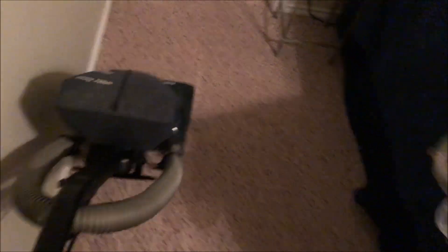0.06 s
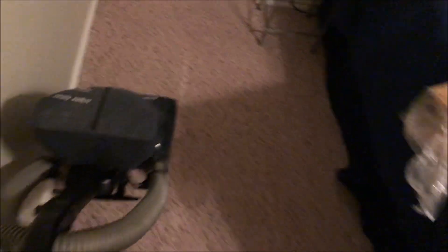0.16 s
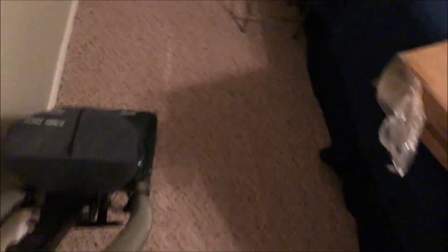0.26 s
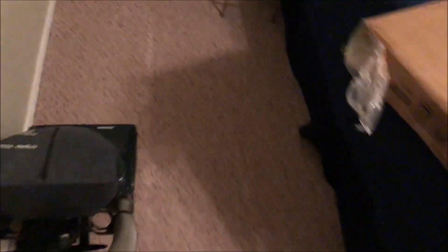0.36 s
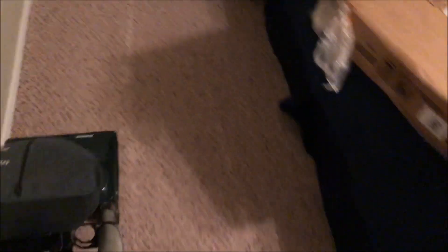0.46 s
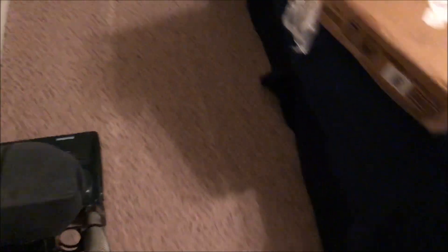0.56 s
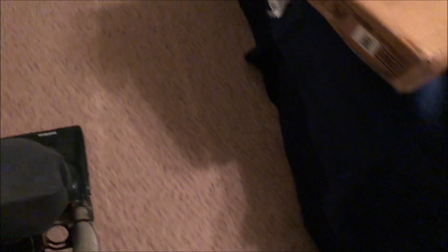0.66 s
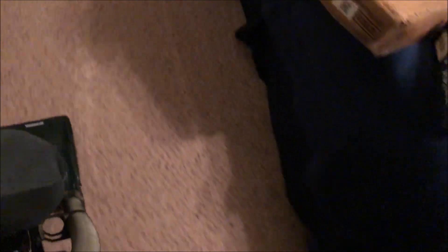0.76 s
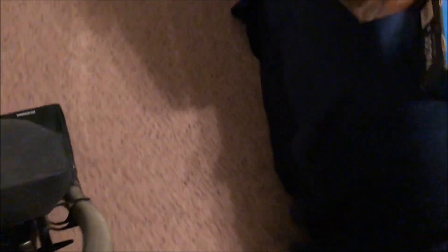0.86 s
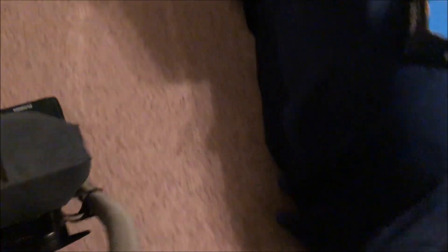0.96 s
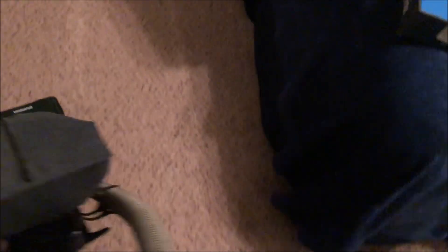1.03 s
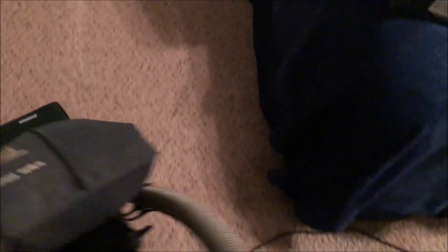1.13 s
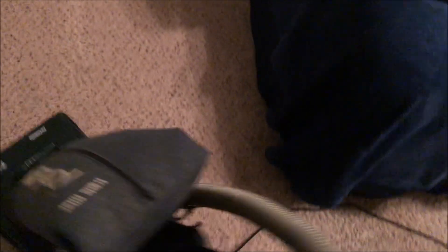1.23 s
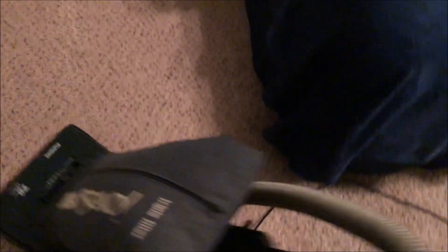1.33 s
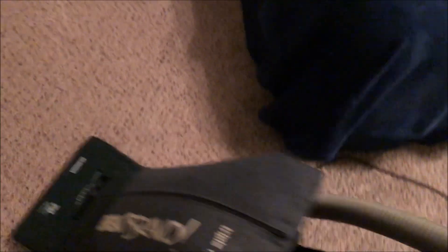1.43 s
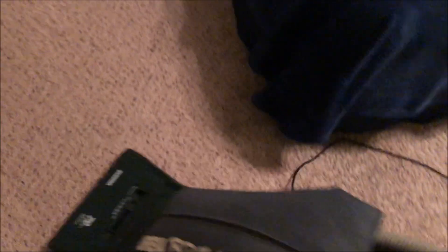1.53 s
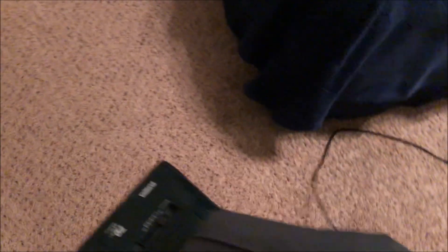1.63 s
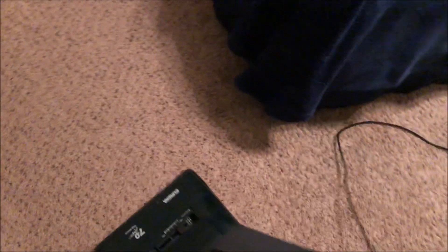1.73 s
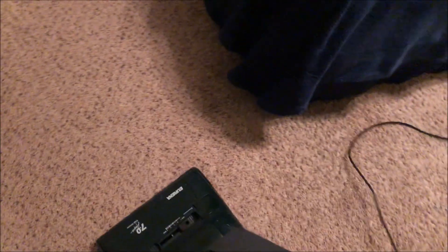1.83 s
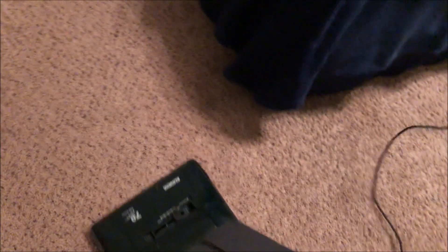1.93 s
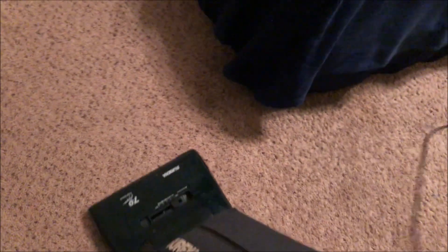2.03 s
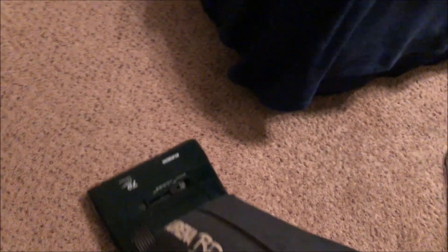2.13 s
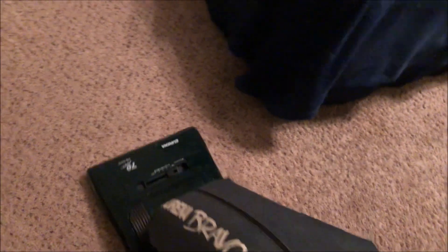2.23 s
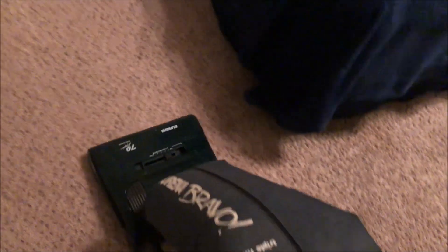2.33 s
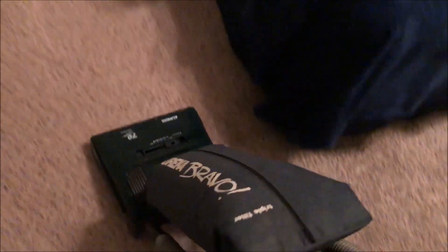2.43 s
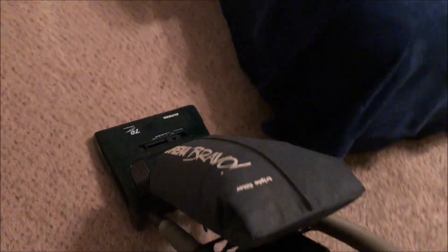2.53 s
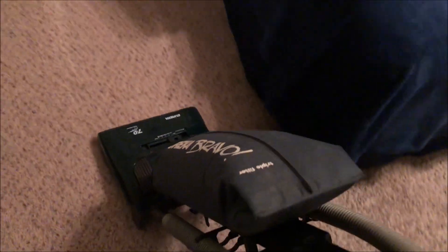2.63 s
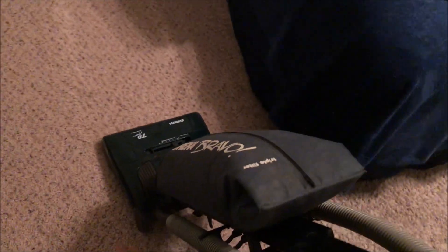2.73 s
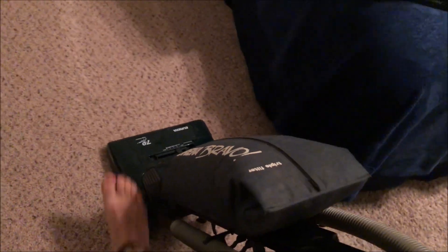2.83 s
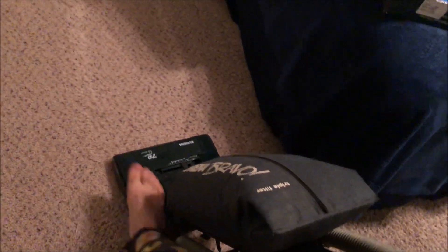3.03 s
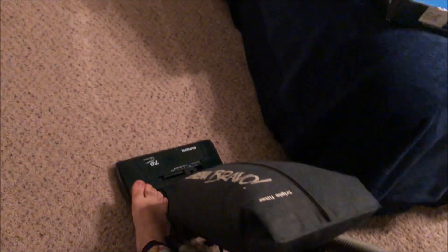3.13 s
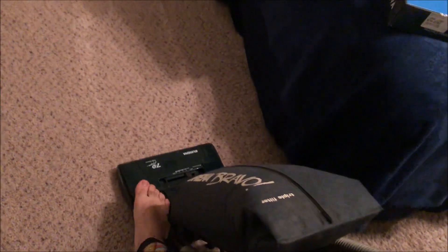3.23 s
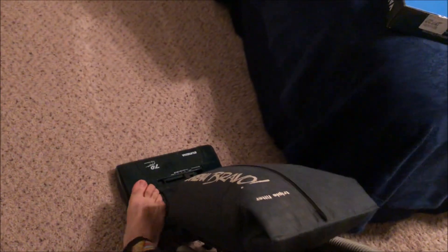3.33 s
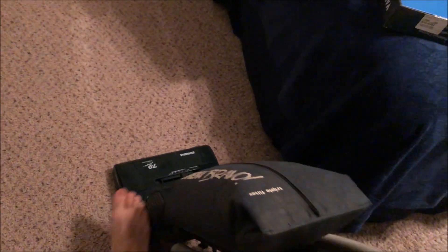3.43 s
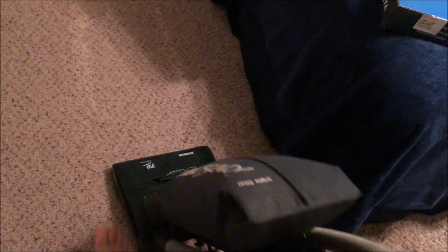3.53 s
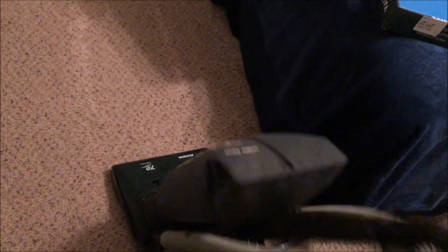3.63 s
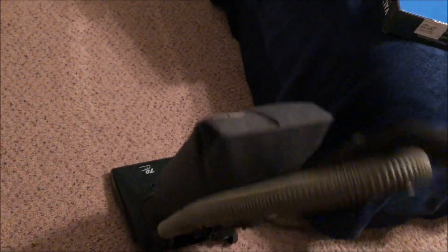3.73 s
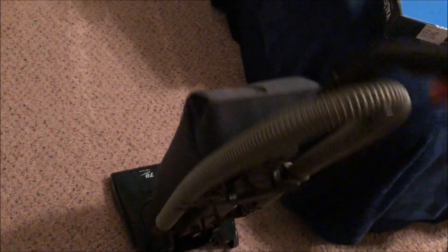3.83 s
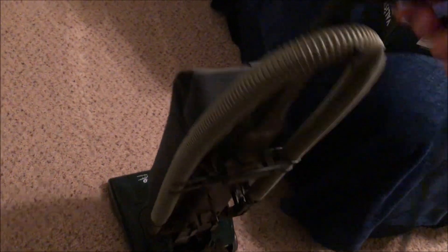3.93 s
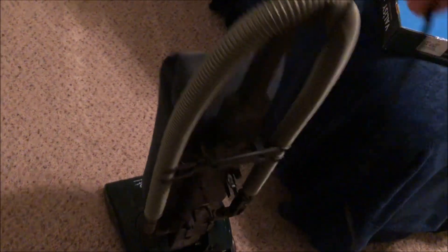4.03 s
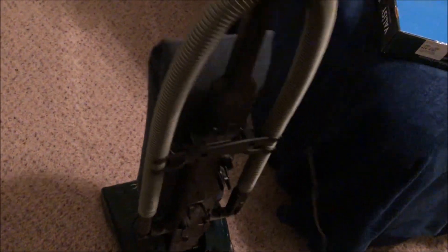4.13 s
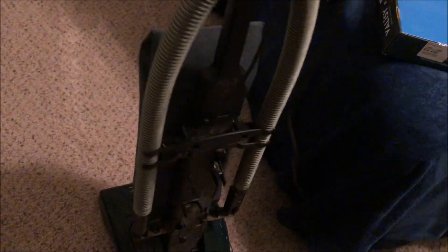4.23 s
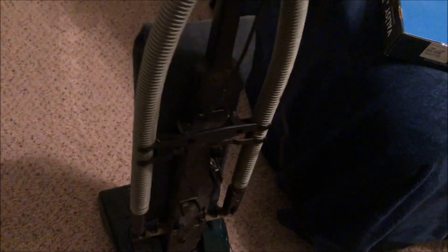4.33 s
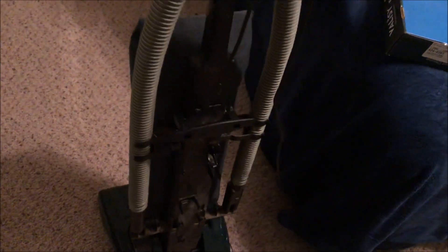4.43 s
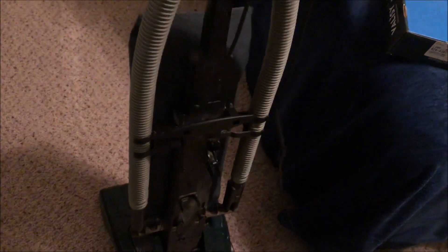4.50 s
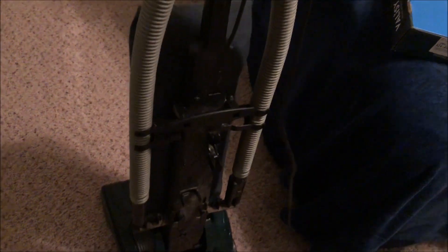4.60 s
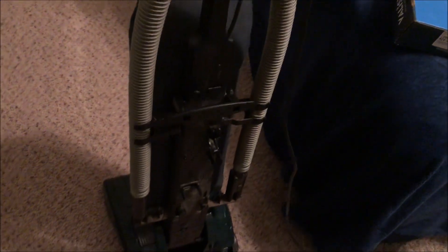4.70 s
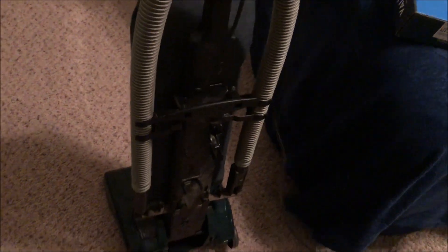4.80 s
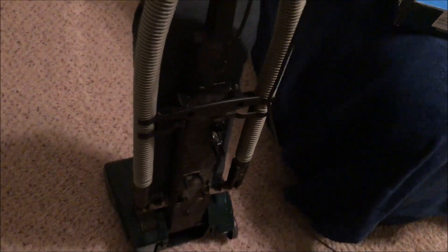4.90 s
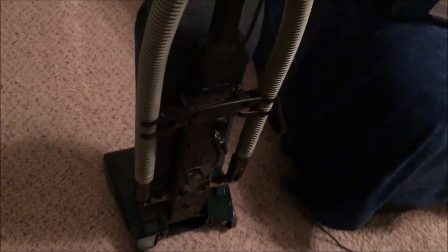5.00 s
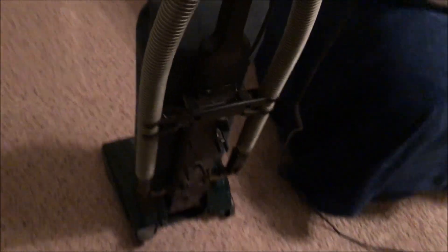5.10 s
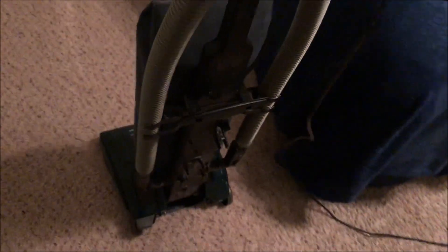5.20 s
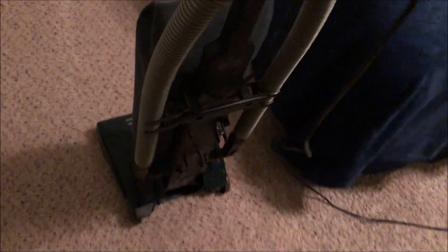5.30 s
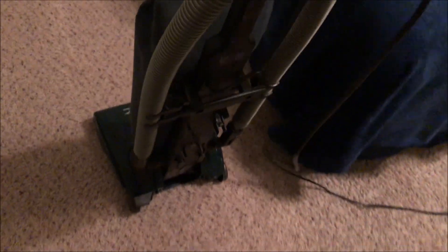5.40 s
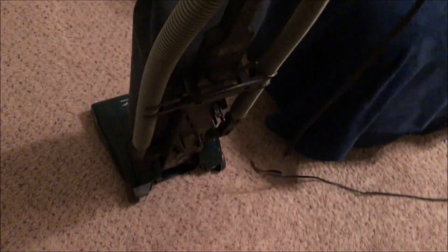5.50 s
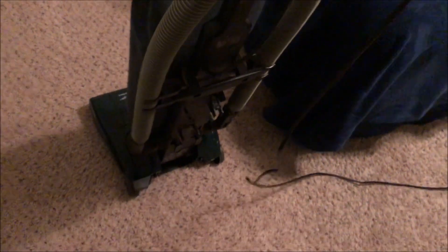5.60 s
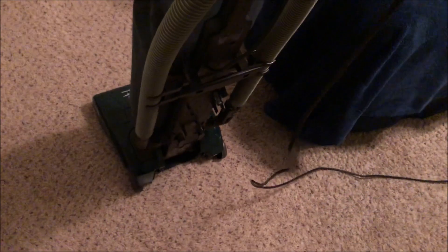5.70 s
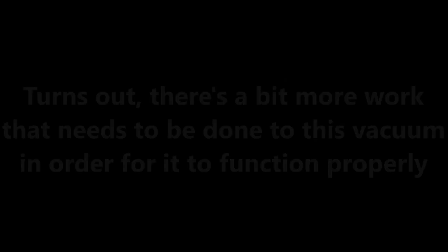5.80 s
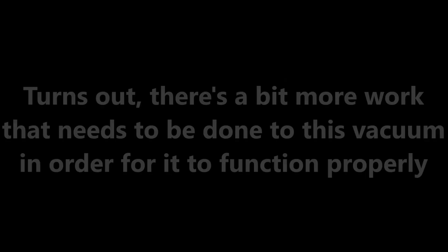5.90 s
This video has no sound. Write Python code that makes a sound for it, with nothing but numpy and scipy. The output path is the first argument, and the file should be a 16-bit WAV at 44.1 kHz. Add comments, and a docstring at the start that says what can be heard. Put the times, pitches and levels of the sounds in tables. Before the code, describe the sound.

Heard from the handle in a small, carpeted room, an upright vacuum gives a steady rush of air, a droning brush and a high, uneven whine. A little past halfway the power cuts and the motor coasts down in a falling tone. During the run-down the hose ticks and the handle locks upright with one sharp, loud clack. A light rattle, a tiny spring ping and soft creaks come as the machine goes quiet.

```python
"""Upright vacuum cleaner on carpet

Heard from the handle: air roars through the ducts, a seven-blade fan whines, the motor hums and
the belt-driven brush roll drones. Switched off, the shaft coasts down and the tones fall with it.
The handle is swung upright and latches with a loud plastic clack; the parked machine creaks and ticks."""
import sys
import numpy as np
from scipy import signal
from scipy.fft import rfft, irfft
from scipy.io import wavfile
from scipy.ndimage import uniform_filter1d

SR = 44100
rng = np.random.default_rng(int(sys.argv[2]) if len(sys.argv) > 2 else 0)


def transcribe(signal):
    """Save signal, clipped to [-1, 1], as a 16-bit WAV file at the path in sys.argv[1]."""
    frames = np.atleast_2d(signal).T
    limited = np.clip(frames, -1, 1)
    pcm = np.round(limited * 32767).astype(np.int16)
    wavfile.write(sys.argv[1], SR, pcm)


N = 262395
TIME = np.arange(N) / SR
OFF_S, END_S = 3.232, 5.84
BELT_RATIO = .2762  # brush turns per shaft turn
TILT_FROM_HZ = 1500

# Shaft under power, sagging as the nozzle grips the carpet: time_s, speed_hz
SHAFT_SPEED = [(0, 263.4), (1.88, 263), (2, 260.4), (2.08, 256.6), (2.2, 255.2), (2.6, 260.3)]
def shaft_speed(drag_halving_s=.68, friction_hz=50):
    """Turns per second: held until switch-off, then braked by air drag and, below friction_hz, friction."""
    powered_hz = curve(SHAFT_SPEED)
    braking = np.maximum(TIME - OFF_S, 0) * friction_hz / (powered_hz * drag_halving_s)
    speed_hz = friction_hz * np.tan(np.arctan(powered_hz / friction_hz) - braking)
    return speed_hz * (1 + .001 * walk(8.2))


# Air under power, as the machine is pushed and turned: time_s, roar_db, rush_db, hiss_db
POWERED_FLOW = [(0.24, -22, -23, -26), (0.35, -24, -22.5, -26.5), (0.91, -19.5, -22, -26.5),
                (1.57, -23, -22, -26), (1.59, -23.5, -18, -27), (3.1, -25, -26, -24),
                (3.2, -23.5, -25.5, -24.5)]
# Run-down, roar to fine hiss: half_speed_loss_db, exponent, die_from_s, die_db_per_s
RUN_DOWN = [(11, .75, 4.99, 83), (8.5, .65, 4.926, 126), (6.5, .55, 4.686, 84), (5, 1, 4.19, 46.5)]
def flow_levels(shaft_hz, fine_hiss_db=-26.5, knee_s=.036):
    """Roar, rush, hiss and fine hiss in dB: they sink as the fan slows, then die, the highest first."""
    halvings = np.maximum(np.log2(curve(SHAFT_SPEED) / shaft_hz), 0)
    powered_db = [curve(POWERED_FLOW, column) for column in (1, 2, 3)] + [fine_hiss_db]
    return [db - loss_db * halvings ** exponent - db_per_s * knee_s * np.logaddexp(0, (TIME - s) / knee_s)
            for db, (loss_db, exponent, s, db_per_s) in zip(powered_db, RUN_DOWN)]


# Air noise spectrum: freq_hz, gain_db
AIR_SPECTRUM = [(20, -36.5), (50, -25.5), (100, -8.5), (160, -3.5), (260, 2), (650, 2.5), (850, -1.5),
                (1450, -0.5), (2000, -6), (2500, -12), (4800, -17.5), (8000, -18.5), (12500, -26.5),
                (16000, -24.5)]
# Duct and motor housing resonances: centre_hz, width_hz, gain_db
DUCT_RESONANCES = [(272, 30, 7), (1200, 130, 1), (3100, 620, 3), (3652, 210, 6), (4113, 430, 6.5),
                   (5600, 710, 5.5), (7640, 170, 4.5), (8500, 820, 3), (11200, 3400, 3.5)]
# Hollow body, ringing through as the jet dies: centre_hz, width_hz, gain_db
HOLLOW_BODY = [(70, 19, -7.5), (158, 17, 4.5), (225, 19, 4.5), (262, 43, -4), (414, 190, 3), (554, 78, -5),
               (1400, 98, 1.5), (1700, 230, -3.5), (1990, 61, -3.5), (2300, 80, 4), (3520, 130, 7.5),
               (4460, 220, 3.5), (7790, 140, 5), (8790, 410, 6.5), (13000, 3500, -4.5)]
# Suction resonance, rising as the nozzle tips and seals: time_s, centre_hz, gain_db
NOZZLE_RESONANCE = [(1.52, 1200, 0), (1.67, 1330, 8), (1.73, 1350, 3), (1.79, 1450, 6), (1.82, 1620, 3),
                    (1.87, 1690, 8), (1.94, 1770, 7), (2.05, 1800, 0)]
def airflow(shaft_hz, throb_depth=.023, flutter_db=.5, patchy_db=3, nozzle_width_hz=130):
    """Turbulence rings the ducts and throbs with the brush roll."""
    window = dict(nperseg=2048, noverlap=1536)
    hz, t, spectrum = signal.stft(rng.standard_normal(N), fs=SR, **window)
    hz = hz[:, None]
    frames = np.minimum((t * SR).astype(int), N - 1)
    hollowness = np.interp(shaft_hz[frames], [150, shaft_hz.max()], [1, 0])
    ducts_db = shape_db(AIR_SPECTRUM, hz) + bumps_db(DUCT_RESONANCES, hz)
    timbre = undb(ducts_db + hollowness * bumps_db(HOLLOW_BODY, hz))
    bands_hz = [(130, 800), (800, 1700), (2500, 4400), (4400, 15000)]  # roar, rush, hiss, fine hiss
    log_centres = np.log(bands_hz).mean(axis=1)
    flow_db = 0
    for k, ((lo, hi), band_db) in enumerate(zip(bands_hz, flow_levels(shaft_hz))):
        timbre_db = 10 * np.log10(np.mean(timbre ** 2 * (hz > lo) * (hz < hi), axis=0))
        share = np.interp(np.log(hz + 1), log_centres, np.eye(len(bands_hz))[k])
        flow_db = flow_db + share * (band_db[frames] - timbre_db)
    seal_hz, seal_db = (curve(NOZZLE_RESONANCE, column)[frames] for column in (1, 2))
    nozzle_db = bumps_db([(seal_hz, nozzle_width_hz, seal_db)], hz)
    ripple_db = patchy_db * spectral_ripple(spectrum.shape)
    air = signal.istft(spectrum * timbre * undb(flow_db + nozzle_db + ripple_db), **window)[1][:N]
    throb = 1 + throb_depth * np.sin(2 * np.pi * np.cumsum(2 * shaft_hz * BELT_RATIO) / SR)
    return air * throb * undb(-.96 + flutter_db * walk(30))


# Fan whine swelling and abruptly dropping away: time_s, level_db
WHINE_LEVEL = [(0, -28), (.22, -26), (.26, -45), (.32, -30), (.47, -26), (.51, -42), (.61, -35),
               (.645, -19), (.74, -22.5), (.78, -17.5), (.87, -42), (.915, -40), (.96, -19.5), (1, -17),
               (1.17, -19), (1.24, -42), (1.33, -23.5), (1.47, -42), (1.53, -24.5), (1.68, -23),
               (1.72, -33), (1.93, -29), (1.98, -20), (2.1, -20), (2.21, -16.5), (2.34, -20.3),
               (2.48, -17.5), (2.53, -35), (2.58, -21.5), (2.68, -26), (2.71, -40), (2.8, -40),
               (2.92, -26.5), (3.24, -25.5)]
# Housing radiation; the falling whine flares at its resonances: pitch_hz, gain_db
HOUSING_GAIN = [(500, -90), (800, -33), (930, -25), (985, -11.5), (1060, -22), (1160, -9.5), (1265, -4),
                (1410, -3), (1500, 3.5), (1570, 1), (1650, 4.5), (1780, 1.3), (1845, 1.9)]
def fan_whine(shaft_hz, blades=7):
    """Blade-passing tone: clean under power; as it falls it roughens and the room smears it."""
    blade_hz = blades * shaft_hz
    coasting = np.clip((TIME - OFF_S) / .06, 0, 1)
    level_db = curve(WHINE_LEVEL) + shape_db(HOUSING_GAIN, blade_hz)
    whine = tone(blade_hz, level_db, fade_db=1 + coasting, fade_hz=40, blur_rad=.12 + .15 * coasting)
    return whine * (1 - coasting) + room(whine * coasting, wet_db=-8.5, t60_s=.33)


# Unbalance, blade overtones, commutator and bearings: shaft_multiple, level_db
MOTOR_TONES = [(1, -46), (5.23, -43), (13.12, -43.5), (14, -41.5), (15.74, -44), (21, -43), (22, -45),
               (26.2, -50), (30.47, -49.5), (31.47, -46.5), (34.06, -49.5), (42, -53)]
# Tones from the housing's side, once it faces the listener: shaft_multiple, level_db
SIDE_TONES = [(4.57, -38), (7.96, -42)]
# Magnetic hum: pitch_hz, level_db
MAGNETIC_HUM = [(480, -34.5), (600, -39.5), (720, -44.5)]
def motor(shaft_hz, side_rise_db=11, hum_turn_db=-6):
    """Shaft tones waver, then fall with the speed and sink ever faster; the hum stops with the current."""
    slowing_db = -24 * np.maximum(TIME - OFF_S, 0) ** 1.7
    partials = MOTOR_TONES + [(k, db - side_rise_db * (1 - turned())) for k, db in SIDE_TONES]
    whirr = sum(tone(k * shaft_hz, db + slowing_db, fade_db=2, fade_hz=7, blur_rad=.65)
                for k, db in partials)
    hum = sum(tone(hz, db + hum_turn_db * turned(), fade_db=3, fade_hz=5.15, blur_rad=.29)
              for hz, db in MAGNETIC_HUM)
    current = np.clip((OFF_S - TIME) / .067, 0, 1)
    return room(whirr, wet_db=-9) + hum * current


# Brush roll drone: roll_multiple, level_db, turn_change_db
BRUSH_TONES = [(1, -48.5, 0), (3, -35.5, -5), (4, -36, 4.5), (5, -37, -3)]
# Two bristle rows beating the carpet: time_s, level_db
BRISTLE_BEAT = [(0, -40), (.4, -31.5), (1.4, -34), (2.05, -32), (2.4, -47), (3.24, -44), (3.55, -70)]
def brush_roll(shaft_hz):
    """The belt turns the roll; its bristle rows strike the carpet twice a turn."""
    roll_hz = shaft_hz * BELT_RATIO
    speed_db = 110 * np.log10(roll_hz / roll_hz.max())
    drone = sum(tone(k * roll_hz, db + turn_db * turned() + speed_db, fade_db=1.8, fade_hz=4.3, blur_rad=.2)
                for k, db, turn_db in BRUSH_TONES)
    return drone + tone(2 * roll_hz, curve(BRISTLE_BEAT), fade_db=1.2, fade_hz=4.3, blur_rad=.055)


# Level dips: centre_s, half_width_s, depth_db
DIPS = [(3.145, .007, 11), (3.401, .007, 10), (3.935, .008, 8), (4.137, .014, 24)]
# Narrow tones in the dips: centre_s, pitch_hz, level_db
DIP_TONES = [(3.143, 1195, -26), (3.143, 8170, -35), (3.4, 3295, -37), (3.935, 3100, -39), (4.132, 1140, -35),
             (4.124, 1450, -33), (4.128, 2300, -35), (4.131, 3650, -40), (4.129, 4300, -41),
             (4.143, 7400, -43)]
def dips(x):
    """The level dips briefly now and then, and a few narrow tones stay."""
    gain = undb(-sum(depth_db * swell(s, half_s) for s, half_s, depth_db in DIPS))
    held_tones = sum(tone(hz, db, fade_db=1, fade_hz=50, blur_rad=.5) * swell(s, .016)
                  for s, hz, db in DIP_TONES)
    return gain * x + held_tones


# Latch, rattle, settling knocks: start_s, level_db, tilt_db_per_octave, crack_t60_s, ring_db
BLOWS = [(4.59, -7, 2, 0.021, -8.5), (4.5922, -9.5, 3, 0.039, -4), (4.673, -31, 3, 0.032, -11),
         (4.765, -34.5, 9.5, 0.047, -14), (4.846, -33, 3, 0.044, -9), (5.225, -49, -13.5, 0.087, -3.5),
         (5.333, -56, -1, 0.021, -10), (5.375, -50.5, -12.5, .06, -2), (5.707, -49, -3, 0.0069, -22),
         (5.726, -51, -7, 0.034, -4)]
# Plastic body modes: pitch_hz, gain_db, t60_s
BODY_MODES = [(155, -15.5, 0.13), (220, -12, 0.09), (395, -7, 0.17), (780, -6.5, 0.13), (985, -8.5, 0.12),
              (1590, -11, .05), (2580, -1, 0.039), (3290, 6, 0.053), (3930, -5, 0.077), (5340, -8.5, 0.044),
              (6410, -5.5, 0.085), (8400, -9, 0.037), (10860, -12, .06)]
# Crack spectrum: freq_hz, gain_db
CRACK_SPECTRUM = [(70, -33), (300, -13.5), (800, 4), (1600, -1.5), (3300, -0.5), (7000, -3), (11000, -10.5),
                  (16000, -20)]
def knocks(size=16384):
    """Each blow or creaking slip cracks and rings the plastic body; the light shell radiates little bass."""
    out, t = np.zeros(N + size), TIME[:size]
    hz, mode_db, t60_s = np.transpose(BODY_MODES)[:, :, None]
    for start_s, db, tilt, crack_t60_s, ring_db in BLOWS + creak():
        crack = colour(rng.standard_normal(size), CRACK_SPECTRUM, tilt) * undb(-60 * t / crack_t60_s)
        gains = undb(mode_db + tilt * np.log2(1 + hz / TILT_FROM_HZ))
        modes = undb(-60 * t / t60_s) * np.sin(2 * np.pi * (hz * t + rng.random(hz.shape)))
        ring = (gains / np.linalg.norm(gains) * modes).sum(axis=0)
        start = int(start_s * SR)
        out[start:start + size] += undb(db) * (crack + undb(ring_db) * ring)
    shell = signal.sosfilt(signal.butter(4, 130, "high", fs=SR, output="sos"), out[:N])
    return room(shell, wet_db=-6.5, t60_s=.32)


def creak(start_s=5.433, gap_s=.0255, slowing=1.17, level_db=-54.5, step_db=.7):
    """The parked handle sticks and slips, ever slower and a little harder; rows as in BLOWS."""
    tilt_db_per_octave, crack_t60_s, ring_db = -6.5, .033, -5.5
    slips_s = [start_s + gap_s * np.sum(slowing ** np.arange(k)) for k in range(6)]
    return [(s, level_db + k * step_db, tilt_db_per_octave, crack_t60_s, ring_db)
            for k, s in enumerate(slips_s)]


# Spring ping, woody knock, dry snap with its thud: start_s, pitch_hz, level_db, t60_s
RINGS = [(4.825, 9480, -42, 0.17), (4.83, 5950, -51, 0.22), (5.222, 730, -53, .1), (5.224, 980, -49, .05),
         (5.707, 1150, -44, .015), (5.707, 500, -41, .02), (5.714, 115, -48, .06)]
def rings(attack_share=1 / 16):
    """Single decaying tones with a rough edge; the longer they ring, the softer they start."""
    out = 0
    for start_s, hz, db, t60_s in RINGS:
        t = np.maximum(TIME - start_s, 0)
        attack = np.minimum(t / (attack_share * t60_s), 1)
        out = out + attack * tone(hz, db - 60 * t / t60_s, fade_db=2, fade_hz=80, blur_rad=1.2)
    return out


# Hose flexing as the handle rises, cord dragging: centre_s, half_width_s, level_db
RUSTLES = [(4.378, 0.26, -41.5), (5.42, 0.14, -73)]
# Hose ribs ticking as it bends: centre_s
RIB_TICKS_S = [4.357, 4.405, 4.437, 4.457, 4.493]
def grit(ticks_per_s=1800, spread_db=4, dust_db=-45, dust_fade_db_per_s=21.5, rib_db=-36.5):
    """Tiny uneven ticks: dust in the nozzle, fading after switch-off, and the crackle of hose and cord."""
    hits = rng.random(N) < ticks_per_s / SR
    clicks = hits * undb(spread_db * np.minimum(rng.exponential(size=N), 3))
    specks = signal.fftconvolve(clicks, np.exp(-TIME[:512] / .00019))[:N] * rng.standard_normal(N)
    dust = undb(dust_db - dust_fade_db_per_s * np.maximum(TIME - OFF_S, 0))
    rustle = sum(undb(db) * swell(s, half_s) for s, half_s, db in RUSTLES)
    ribs = undb(rib_db) * sum(swell(s, .0032) for s in RIB_TICKS_S)
    crackle = colour(specks, [(500, -10.5), (3500, 5), (15000, -10.5)])
    return crackle * (dust + rustle) + unit(specks) * ribs


# Quiet room spectrum: freq_hz, gain_db
ROOM_SPECTRUM = [(25, -20.5), (55, -1.5), (120, 2.5), (220, 4), (400, -8.5), (550, -13), (1000, -17.5),
                 (2500, -28.5), (6000, -27), (15000, -33)]
def background(room_db=-64):
    """Low room noise, and a faint tone that lingers as the motor stops."""
    linger = tone(hz=403, db=-54.5, fade_db=-1, fade_hz=6.1, blur_rad=.08) * swell(5.12, .11)
    return undb(room_db) * colour(rng.standard_normal(N), ROOM_SPECTRUM) + linger


def room(x, wet_db, t60_s=.24, size=16000):
    """A small carpeted room adds a short diffuse tail, dull on top."""
    t = TIME[:size]
    noise = colour(rng.standard_normal(size), [(100, 9.5), (3000, .5), (15000, -5)])
    tail = noise * undb(-60 * t / t60_s) * (t > .004)
    return x + undb(wet_db) * signal.fftconvolve(x, tail / np.linalg.norm(tail))[:N]


def spectral_ripple(shape):
    """Random narrow peaks and notches that shift slowly over time."""
    field = rng.standard_normal(shape)
    for size, axis in [(2, 0), (20, 1), (7, 1)]:  # axis 0 frequency, 1 time
        field = uniform_filter1d(field, size=size, axis=axis)
    return unit(field)


def turned(start_s=1.4, end_s=2.6):
    """How far the machine has swung side-on to the listener, 0 to 1."""
    return np.interp(TIME, [start_s, end_s], [0, 1])


def tone(hz, db, fade_db, fade_hz, blur_rad):
    """A steady or gliding sine whose level and phase wander."""
    phase = 2 * np.pi * np.cumsum(np.broadcast_to(hz, N)) / SR + blur_rad * walk(45)
    return np.sqrt(2) * undb(db + fade_db * walk(fade_hz)) * np.sin(phase)


def walk(rate_hz):
    """Random drift with a spread near 1."""
    return 1.34 * np.interp(TIME * rate_hz, np.arange(512), rng.standard_normal(512))


def swell(centre_s, half_width_s):
    """Flat-topped rise and fall, 0 to 1."""
    return np.exp(-((TIME - centre_s) / half_width_s) ** 4)


def curve(rows, column=1):
    """A table column joined by straight lines in time."""
    rows = np.array(rows)
    return np.interp(TIME, rows[:, 0], rows[:, column])


def colour(x, points, tilt_db_per_octave=0):
    """Filter by a spectrum and a treble tilt; rms 1."""
    hz = np.fft.rfftfreq(len(x), 1 / SR)
    gain_db = shape_db(points, hz) + tilt_db_per_octave * np.log2(1 + hz / TILT_FROM_HZ)
    return unit(irfft(rfft(x) * undb(gain_db), len(x)))


def shape_db(points, hz):
    """A spectrum read on a log-frequency axis."""
    points_hz, db = np.transpose(points)
    return np.interp(np.log(hz + 1), np.log(points_hz), db)


def bumps_db(resonances, hz):
    """Summed resonance humps."""
    return sum(db / (1 + (2 * (hz - centre_hz) / width_hz) ** 2) for centre_hz, width_hz, db in resonances)


def undb(db):
    """Decibels to gain."""
    return 10 ** (np.asarray(db) / 20)


def unit(x):
    """Scale to rms 1."""
    return x / np.sqrt(np.mean(x ** 2))


def scene():
    """One shaft drives fan, motor and brush; both channels are the same."""
    shaft_hz = shaft_speed()
    machine = airflow(shaft_hz) + motor(shaft_hz) + brush_roll(shaft_hz) + grit()
    mono = dips(machine) + fan_whine(shaft_hz) + knocks() + rings() + background()
    return np.array([mono, mono])


def record(dry):
    """The loudest peaks are rounded, the sound stops at END_S and the top is cut steeply."""
    ceiling, top_hz = .85, 15750
    rounded = dry / (1 + (dry / ceiling) ** 6) ** (1 / 6)
    stop = np.clip((END_S - TIME) / .004, 0, 1)
    return signal.sosfilt(signal.ellip(12, .1, 80, top_hz, fs=SR, output="sos"), rounded * stop)


dry = scene()
out = record(dry)
transcribe(out)
```